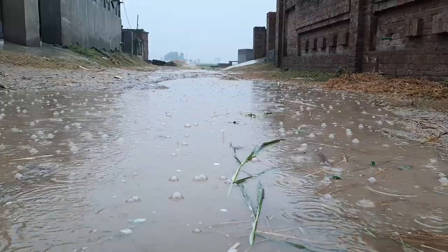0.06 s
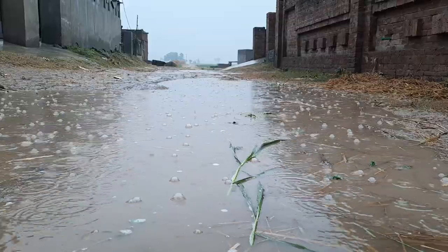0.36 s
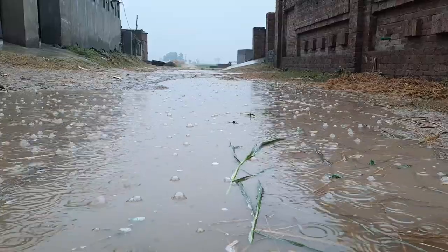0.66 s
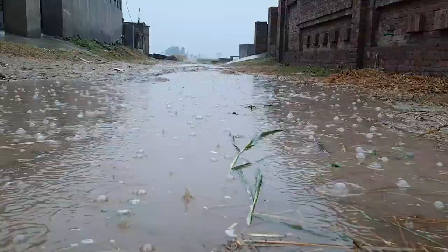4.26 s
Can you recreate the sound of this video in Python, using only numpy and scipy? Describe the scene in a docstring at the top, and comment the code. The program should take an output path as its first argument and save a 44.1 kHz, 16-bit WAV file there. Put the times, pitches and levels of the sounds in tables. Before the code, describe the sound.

Heavy rain builds on a flooded lane, with drops knocking on an umbrella overhead and puddles fizzing all around.

```python
"""Heavy rain on a flooded village lane, swelling over the first seconds, heard from under an umbrella.
Just overhead, drops knock on the taut cloth and burst into spray; all round, near and far, the puddles
fizz with splashes and small ringing bubbles. A few drops land on the stereo microphone itself:
dull thumps in the left port, bright ticks on the housing. Moving air adds a faint rumble."""
import sys
import numpy as np
from scipy import signal
from scipy.fft import rfft, irfft
from scipy.io import wavfile
from scipy.ndimage import uniform_filter1d

SR = 44100
rng = np.random.default_rng(int(sys.argv[2]) if len(sys.argv) > 2 else 0)


def generate_wav(sig):
    """Save sig (samples, or channels by samples) to the path in sys.argv[1] as 16-bit PCM at SR."""
    pcm = np.round(np.clip(np.atleast_2d(sig).T, -1, 1) * 32767).astype(np.int16)
    wavfile.write(sys.argv[1], SR, pcm)


N = 261160

# Strength of the rain. Each row: time in seconds, puddle fizz in dB, patter on the cloth in dB.
RAIN_LEVELS = [(0.1, -44, -49), (0.88, -43, -46), (1.02, -39.5, -40.5), (1.3, -37.5, -43), (1.45, -35, -42),
               (2.25, -33.5, -37), (2.52, -35, -39.5), (3.15, -33.5, -38), (3.7, -31.5, -35.5),
               (4.5, -31, -36.0), (5.55, -31, -36), (5.92, -35.5, -34)]
# Tone of the puddles all round. Each row: frequency in Hz, gain in dB.
PUDDLE_SPECTRUM = [(40, -32), (120, 4.5), (220, 0), (320, -1), (450, -3), (800, -3.5), (1700, -4),
                   (3000, -0.5), (5500, -1), (8000, -2), (11000, -1.5), (15000, -0.5)]
# Modes of the wet cloth overhead. Each row: frequency in Hz, width in Hz, gain in dB.
CLOTH_MODES = [(172, 162, -1), (322.6, 54, 7), (588, 360, -4), (830, 150, -6), (968, 81, 0),
               (1350, 410, -4), (1668, 140, 1), (2100, 376, 5), (2870, 860, -0.5)]
# Tone of a drop bursting on the cloth. Each row: frequency in Hz, gain in dB.
SPRAY_SPECTRUM = [(300, 4), (1500, -16.5), (3000, 2), (5500, 5.5), (8000, 2), (11000, -2), (15000, -8.5)]
# The heaviest drops on the umbrella. Each row: start in seconds, knock and spray in relative dB,
# hardness of the contact as a corner frequency in Hz.
HEAVY_DROPS = [(0.23, -37.5, -43, 1500), (0.267, -33.5, -37.5, 1700), (0.578, -33, -42, 1000),
               (0.612, -35.5, -38.5, 1800), (0.653, -33.5, -37, 1300), (0.942, -32, -35, 1000),
               (0.978, -36, -39, 4000), (1.101, -33, -32, 4000), (1.394, -24, -31, 1190),
               (1.501, -21, -25.5, 1100), (1.668, -25, -32, 895), (1.724, -27.5, -27, 1700),
               (1.763, -21.5, -30, 1250), (1.869, -24, -28.5, 1300), (2.03, -27, -41, 4000),
               (2.148, -26.5, -35, 1500), (2.17, -24, -39, 3000), (2.243, -27, -32, 1800),
               (2.264, -27.5, -30.5, 1200), (2.272, -26, -33, 1600), (2.691, -29, -37, 1100),
               (2.894, -26, -27.5, 4000), (2.987, -25.5, -27.5, 800), (3.116, -24, -30, 800),
               (3.168, -26.5, -31, 1500), (3.27, -27.5, -33, 1000), (3.316, -25.5, -31, 2800),
               (3.337, -26.5, -33, 2300), (3.355, -26, -28.5, 2100), (3.492, -26.5, -44, 1900),
               (3.624, -23.5, -29, 1200), (3.648, -13.5, -34, 920), (3.664, -23, -19.5, 1200),
               (3.888, -31, -24, 1500), (3.985, -23.5, -29, 2900), (4.078, -26.5, -30, 1100),
               (4.372, -22.5, -27, 4000), (4.423, -21, -48, 750), (4.738, -23.5, -26, 1100),
               (4.837, -19.5, -27, 1450), (4.932, -24.5, -29.5, 1600), (5.013, -24.5, -30, 2400),
               (5.092, -25.5, -27, 1250), (5.184, -20, -28.5, 1090), (5.221, -24, -39, 800),
               (5.266, -23, -30, 1600), (5.428, -24, -26, 1000), (5.522, -25, -31, 1200),
               (5.553, -19, -27.5, 2520), (5.561, -25, -28, 2700), (5.582, -26, -29, 700),
               (5.733, -21.5, -33, 1000), (5.749, -29, -21.5, 4000)]
# Air stirring at the microphone. Each row: time in seconds, level in dB.
DRAUGHT_LEVELS = [(0, -80), (1.2, -85), (1.8, -54), (2.6, -70), (4.6, -75), (5.3, -51), (5.6, -41),
                  (5.92, -42)]
# Droplets on the housing. Each row: start in seconds, relative level in dB, left minus right in dB.
HOUSING_TICKS = [(2.2150, -34, 0), (3.1148, -38, 2), (4.2712, -27.5, -10), (5.4697, -17.5, 2),
                 (5.8424, -38, 11)]
# Drops on the left port. Each row: start in seconds, push in dB, its decay in seconds, crack in dB.
PORT_DROPS = [(2.3393, 11.5, 0.0016, -12), (3.5178, -4.5, 0.002, -34), (3.9368, 0.5, 0.00047, -24),
              (3.9380, 6, 0.002, -32), (5.475, -20, 0.0019, -45)]
# Colour of the microphone's left and right ports. Each row: frequency in Hz, gain in dB.
LEFT_RESPONSE = [(30, -7), (100, -10.5), (600, 4.5), (950, 5.5), (1630, 8), (2600, 1), (4800, -4),
                 (6300, 1), (7400, -5.5), (8700, -19.5), (9600, -16.5), (11600, -11), (13800, 1),
                 (15700, -5)]
RIGHT_RESPONSE = [(30, -10), (100, -5.5), (600, 6), (1100, 4.5), (2000, 5), (3200, 0), (4000, -1),
                  (5400, 5), (7000, 0.5), (8000, 6), (8700, 1.5), (9600, -9.5), (12000, -6), (15700, 0.5)]

TOP_HZ = 15800
BLOW_S = .004
SIZE = 1024  # samples in one short sound
TIME = np.arange(N) / SR
AGE = np.arange(SIZE) / SR
FREQ = np.arange(SIZE // 2 + 1) * SR / SIZE


def undb(db):
    """Decibels to gain."""
    return 10 ** (np.asarray(db) / 20)


def curve(table, t, column=1):
    """One column of a timed table, read at the times t."""
    table = np.array(table)
    return np.interp(t, table[:, 0], table[:, column])


def unit(x):
    """Scale to rms 1."""
    return x / np.sqrt(np.mean(x ** 2))


def unit_blows(x):
    """Scale each blow (events, ports, samples) to the energy of BLOW_S seconds at rms 1."""
    energy = (x ** 2).sum(-1).mean(-1)
    return x * np.sqrt(BLOW_S * SR / energy)[:, None, None]


def butter(x, order, hz, kind):
    """Flat-topped filter with its corners at hz."""
    return signal.sosfilt(signal.butter(order, hz, kind, fs=SR, output="sos"), x)


def resonance(x, centre_hz, width_hz):
    """Band-pass with gain 1 at its centre."""
    return signal.lfilter(*signal.iirpeak(centre_hz, centre_hz / width_hz, fs=SR), x)


def response(points):
    """Causal frequency response through (Hz, dB) points."""
    hz, db = np.transpose(points)
    gain = undb(np.interp(np.log(FREQ + 1), np.log(hz), db))
    cepstrum = irfft(np.log(gain))
    cepstrum[1:SIZE // 2] *= 2
    cepstrum[SIZE // 2 + 1:] = 0
    return np.exp(rfft(cepstrum))


def colour(x, points):
    """Filter each row of x by a spectrum of (Hz, dB) points."""
    return signal.fftconvolve(np.atleast_2d(x), irfft(response(points))[None], axes=1)[:, :N]


def wander(rate_hz):
    """Random levels held 1 / rate_hz seconds and smoothed twice; spread near 1."""
    hold = int(SR / rate_hz)
    steps = np.repeat(rng.standard_normal(N // hold + 1), hold)
    return 1.3 * uniform_filter1d(uniform_filter1d(steps, hold), hold)[:N]


def place(times, sounds):
    """Lay short stereo sounds on the time line."""
    out = np.zeros((2, N + SIZE))
    for i, sound in zip(np.clip(times * SR, 0, N).astype(int), sounds):
        out[:, i:i + SIZE] += sound
    return out[:, :N]


def panned(db, pan_db):
    """Gains (events, ports, 1) for a level and a left-minus-right difference."""
    return undb(db[:, None] + pan_db[:, None] * np.array([1, -1]) / 2)[:, :, None]


def splashes(count=6000, size_db=2.5, smear_s=0.0032, pan_db=5):
    """Drops click on the puddles, each smeared by its own spatter."""
    when, size = rng.random((count, 2)).T
    gains = panned(-size_db * np.log(size + .003), pan_db * rng.standard_normal(count))[:, :, 0]
    clicks = np.zeros((N, 2))
    np.add.at(clicks, (when * (N - 1)).astype(int), gains ** 2)
    power = signal.lfilter([1], [1, -np.exp(-2 / (smear_s * SR))], clicks.T)
    return unit(np.sqrt(power) * rng.standard_normal((2, N)))


def bubbles(count=900, centre_hz=4400, spread=0.29, decay_cycles=6, glide=0.058, size_db=3, pan_db=5):
    """Air trapped by drops rings and rises in pitch as it nears the surface."""
    pitch, size, pan = np.clip(rng.standard_normal((count, 3)), -2, 2).T
    hz = np.minimum(centre_hz * np.exp(spread * pitch), TOP_HZ / 2)
    cycles = hz[:, None] * AGE
    rise = 1 + glide * np.tanh(cycles / decay_cycles / 2) / 2
    ring = np.exp(-cycles / decay_cycles) * np.sin(2 * np.pi * cycles * rise)
    times = rng.random(count) * N / SR
    return unit(place(times, ring[:, None] * panned(size_db * size, pan_db * pan)))


def puddles(hiss_db=-2, bubble_db=-16, surge_db=1, flicker_db=2.0, apart_hz=900):
    """The flooded lane: smooth far hiss, nearer splashes and bubbles, surging together."""
    hiss = undb(hiss_db) * rng.standard_normal((2, N))
    left, right = hiss + undb(flicker_db * wander(24.33)) * splashes()
    side = butter(left - right, 1, apart_hz, "high")  # long waves reach both ports alike
    fizz = (left + right + np.array([side, -side])) / 2
    water = colour(fizz, PUDDLE_SPECTRUM) + undb(bubble_db) * bubbles()
    return water * undb(curve(RAIN_LEVELS, TIME) + surge_db * wander(13))


def near_splashes(level_db=-5, band_hz=(2500, 9000)):
    """Drops hit the water right in front of the microphone: crisp ticks."""
    clicks = splashes(count=900, size_db=3.5, smear_s=0.00042)
    return butter(clicks, 2, band_hz, "band") * undb(curve(RAIN_LEVELS, TIME) + level_db)


def knocks(hard_hz, mode_scatter_db=3, detune=0.029, slosh_db=-4, slosh_s=0.0051,
           echo_gain=0.45, echo_s=0.001372, echo_scatter_s=.00008, lag_s=.00009, lag_scatter_s=.00006):
    """Each drop pushes the cloth briefly; where it lands sets the tension, mix of modes and delays."""
    count = len(hard_hz)
    tension, echo, lag, *mix = rng.standard_normal((count, len(CLOTH_MODES) + 3)).T[:, :, None]
    s = 1j * FREQ / (1 + detune * tension)
    cloth = sum(undb(db + mode_scatter_db * share) * s * width / (s ** 2 + s * width + hz ** 2)
                for (hz, width, db), share in zip(CLOTH_MODES, mix))
    # the flattening drop sloshes on, so no two pushes are alike
    slosh = rng.standard_normal((count, SIZE)) * np.exp(-AGE / slosh_s) * np.sqrt(2 / (slosh_s * SR))
    push = (1 + undb(slosh_db) * rfft(slosh)) / (1 + 1j * FREQ / hard_hz[:, None]) ** 2
    # a near surface throws the knock back, and the left port hears it a little late
    delay = -2j * np.pi * FREQ
    right = push * cloth * (1 + echo_gain * np.exp(delay * (echo_s + echo_scatter_s * echo)))
    left = right * np.exp(delay * np.abs(lag_s + lag_scatter_s * lag))
    return unit_blows(irfft(np.stack([left, right], axis=1)))


def sprays(count, rise_s=0.0017, rise_spread=0.26, burst_s=0.0011, settle_s=0.013, settle_db=-23):
    """A drop bursts within a millisecond or two, then its droplets settle."""
    rise = rise_s * np.exp(rise_spread * rng.standard_normal((count, 1, 1)))
    attack = 1 - np.exp(-(AGE / rise) ** 2)
    decay = np.exp(-AGE / burst_s) + undb(settle_db) * np.exp(-AGE / settle_s)
    noise = irfft(rfft(rng.standard_normal((count, 2, SIZE))) * response(SPRAY_SPECTRUM))
    return unit_blows(noise * attack * decay)


def umbrella_drops(times, knock_db, spray_db, hard_hz, knock_pan_db=-1.5, spray_pan_db=4):
    """A knock and a spray per drop, from all sides overhead; the housing shades the treble more."""
    side = rng.standard_normal(len(times))
    knock = knocks(hard_hz) * panned(knock_db, knock_pan_db * side)
    spray = sprays(len(times)) * panned(spray_db, spray_pan_db * side)
    return place(times, knock + spray)


def patter(count=1300, knock_db=-3, spray_db=-6.5, size_db=6, spray_scatter_db=4,
           hard_hz=1900, hard_scatter=0.3):
    """Small drops drum on the cloth at random."""
    when, size = rng.random((count, 2)).T
    wet, hard = rng.standard_normal((count, 2)).T
    times = when * N / SR
    db = curve(RAIN_LEVELS, times, column=2) + size_db * (2 * size ** 2 - 1)  # most are faint
    spray = db + spray_db + spray_scatter_db * np.clip(wet, -2, 2)
    return umbrella_drops(times, db + knock_db, spray, hard_hz * np.exp(hard_scatter * hard))


def medium_drops(count=95, knock_db=6, spray_db=4.5, size_db=1.0, spray_scatter_db=4.5,
                 hard_hz=1900, hard_scatter=0.52):
    """Fuller drops hit the cloth at a loose but steady rate, louder as the rain swells."""
    when, size, wet, hard = rng.uniform(-1, 1, (count, 4)).T
    times = (np.arange(count) + (1 + when) / 2) / count * N / SR
    db = curve(RAIN_LEVELS, times, column=2) + size_db * size
    spray = db + spray_db + spray_scatter_db * wet
    return umbrella_drops(times, db + knock_db, spray, hard_hz * np.exp(hard_scatter * hard))


def heavy_drops(knock_db=-1.5, spray_db=3):
    """Heavy drops strike the cloth and stand out of the patter."""
    times, knock, spray, hard_hz = np.transpose(HEAVY_DROPS)
    return umbrella_drops(times, knock + knock_db, spray + spray_db, hard_hz)


def rebounds(count=3, flight_s=.028, knock_db=-6, spray_db=-7, size_db=2, hard_hz=2200):
    """Each heavy drop throws up a few droplets that fall back on the cloth a moment later."""
    times, parent_knock, parent_spray, _ = np.repeat(HEAVY_DROPS, count, axis=0).T
    flight, size = rng.random((len(times), 2)).T
    patter_db = curve(RAIN_LEVELS, times, column=2)
    scatter_db = size_db * (2 * size - 1)
    # their size follows both the parent drop and the patter
    knock = (parent_knock + patter_db) / 2 + scatter_db + knock_db
    spray = (parent_spray + patter_db) / 2 + scatter_db + spray_db
    return umbrella_drops(times + flight_s * (.1 + flight), knock, spray, np.full(len(times), hard_hz))


def draught(band_hz=(45, 125), gust_db=3):
    """Air moving over the microphone rumbles faintly, unrelated at the two ports."""
    rumble = butter(rng.standard_normal((2, N)), 2, band_hz, "band")
    return unit(rumble) * undb(curve(DRAUGHT_LEVELS, TIME) + gust_db * wander(8))


def housing_ticks(snap_s=0.00038, sizzle_s=0.0056, sizzle_db=-13, edge_hz=8300, level_db=8):
    """Droplets land on the microphone housing: a very bright snap and a short sizzle."""
    times, db, pan_db = np.transpose(HOUSING_TICKS)
    shape = np.exp(-AGE / snap_s) + undb(sizzle_db) * np.exp(-AGE / sizzle_s)
    bursts = unit_blows(rng.standard_normal((len(times), 2, SIZE)) * shape)
    return butter(place(times, bursts * panned(db + level_db, pan_db)), 6, edge_hz, "high")


def port_thumps(ring_hz=57, ring_width_hz=29, leak_hz=90, edge_hz=7000, housing_db=-7,
                crack_s=0.0013, crack_hz=(300, 3500)):
    """A drop plugs the left port: a wet crack, and a pressure step that leaks and rings the bass filter."""
    push = sum(undb(db) * np.exp(-np.abs(TIME - start) / decay_s) * (TIME >= start)
               for start, db, decay_s, _ in PORT_DROPS)
    push = butter(push, 1, [leak_hz, edge_hz], "band")
    housing_knock = undb(housing_db) * resonance(push, centre_hz=380, width_hz=110)
    bass_filter = signal.bilinear([1, 0, 0], [1, 2 * np.pi * ring_width_hz, (2 * np.pi * ring_hz) ** 2], SR)
    thumps = signal.lfilter(*bass_filter, push + housing_knock)
    times, _, _, crack_db = np.transpose(PORT_DROPS)
    bursts = rng.standard_normal((len(times), 1, SIZE)) * np.exp(-AGE / crack_s)
    cracks = unit_blows(butter(bursts, 2, crack_hz, "band")) * undb(crack_db)[:, None, None]
    return np.array([[1], [0]]) * (thumps + place(times, cracks))


def lane_echo(x, t60_s=0.21, wet_db=-14, gap_s=.003):
    """Ground and brick walls return a short, diffuse tail."""
    t = np.arange(SR // 2) / SR
    tail = rng.standard_normal((2, len(t))) * undb(-60 * t / t60_s) * (t > gap_s)
    tail /= np.sqrt((tail ** 2).sum(1, keepdims=True))
    return x + undb(wet_db) * signal.fftconvolve(x, tail, axes=1)[:, :N]


def hollow(x, depth=0.66):
    """All that reaches the ports sounds a little hollow in the upper bass."""
    return x - depth * resonance(x, centre_hz=215, width_hz=90)


def scene():
    """Umbrella and puddles as the two ports hear them, plus what touches the microphone."""
    umbrella = lane_echo(heavy_drops() + rebounds() + medium_drops() + patter())
    left, right = umbrella + puddles() + near_splashes() + housing_ticks()
    ports = np.vstack([colour(left, LEFT_RESPONSE), colour(right, RIGHT_RESPONSE)])
    return hollow(ports + port_thumps()) + draught()


def record(dry, start_s=.061, fade_s=.004):
    """The recorder opens after a moment, clips at full scale and cuts the top."""
    opened = np.clip((TIME - start_s) / fade_s, 0, 1)
    top_cut = signal.ellip(10, .2, 80, TOP_HZ, fs=SR, output="sos")
    return signal.sosfilt(top_cut, np.clip(dry * opened, -1, 1))


dry = scene()
out = record(dry)
generate_wav(out)
```